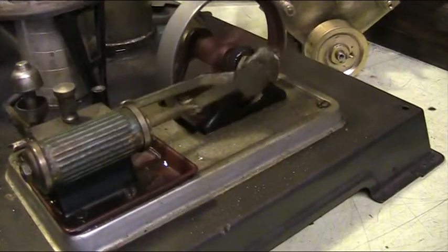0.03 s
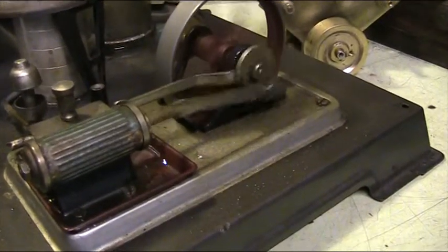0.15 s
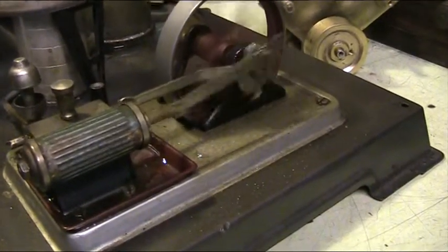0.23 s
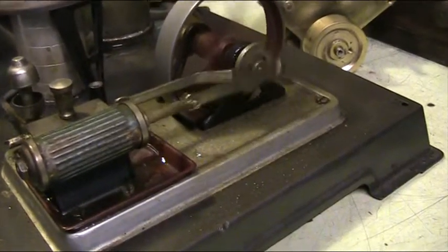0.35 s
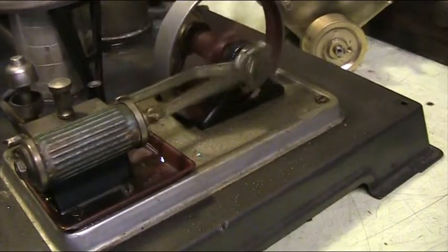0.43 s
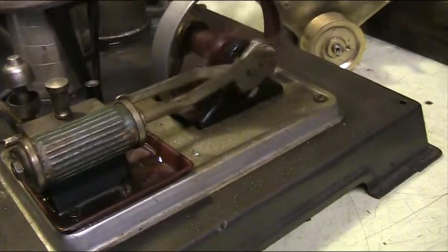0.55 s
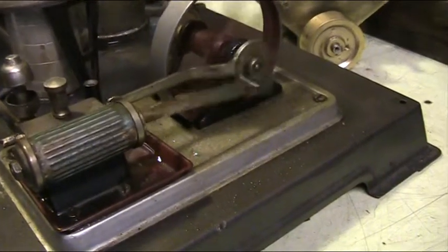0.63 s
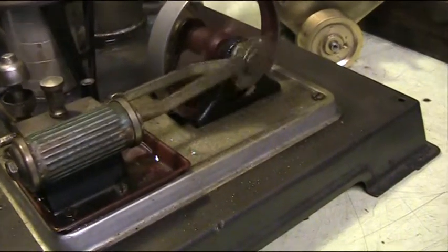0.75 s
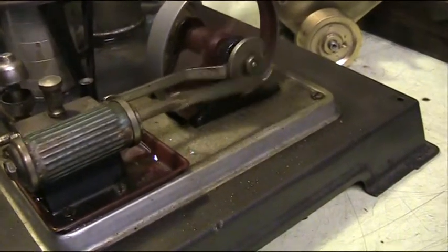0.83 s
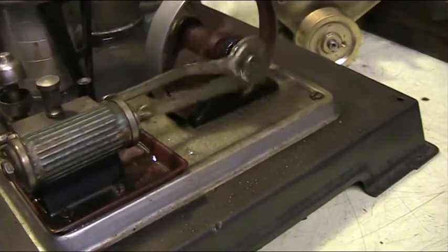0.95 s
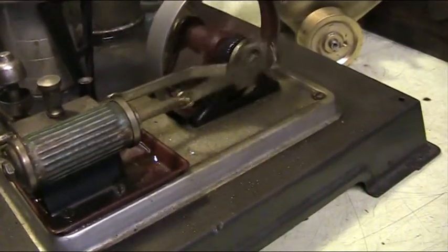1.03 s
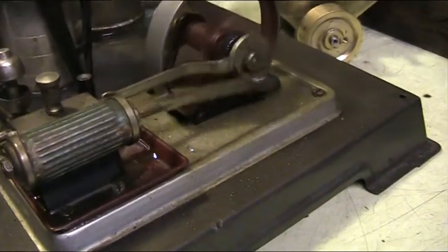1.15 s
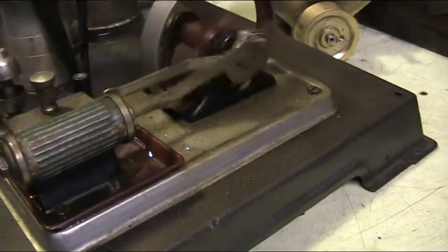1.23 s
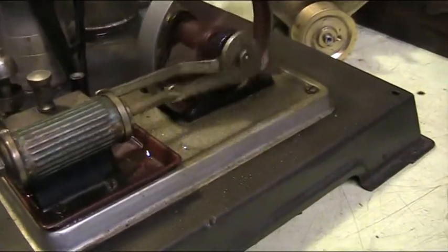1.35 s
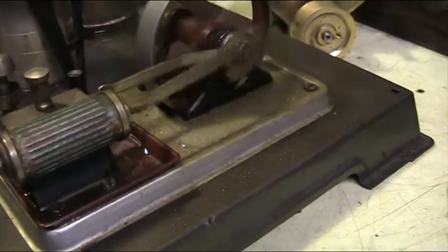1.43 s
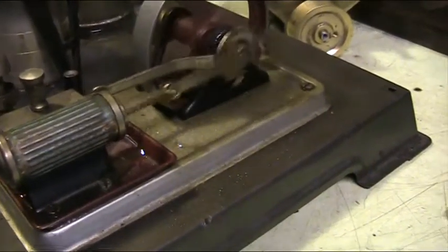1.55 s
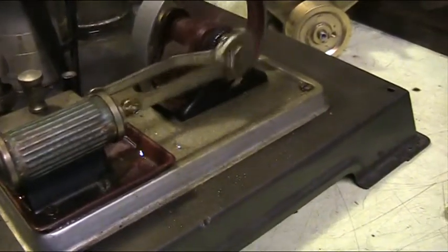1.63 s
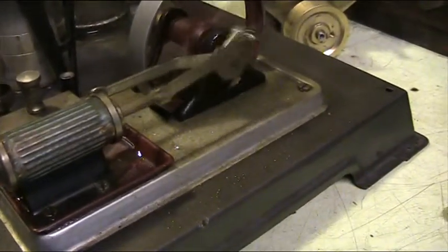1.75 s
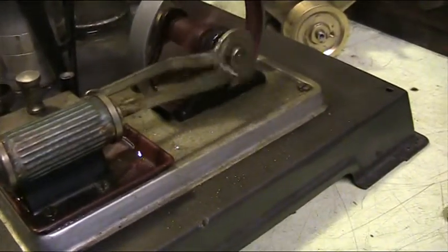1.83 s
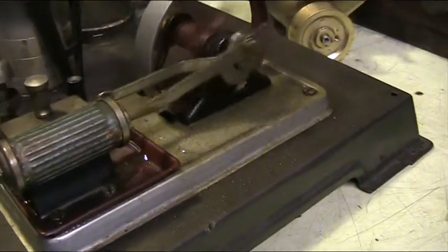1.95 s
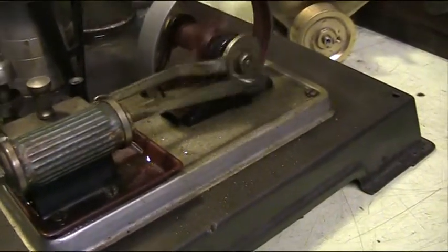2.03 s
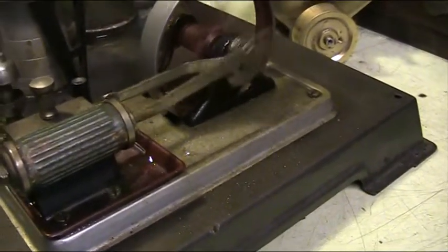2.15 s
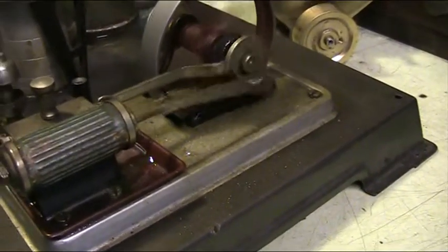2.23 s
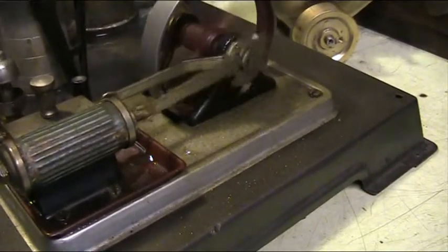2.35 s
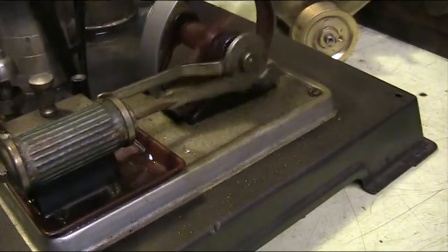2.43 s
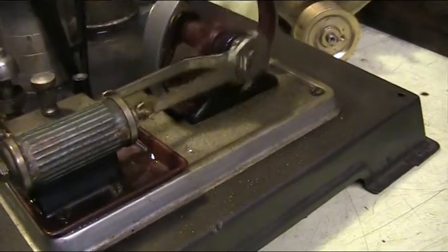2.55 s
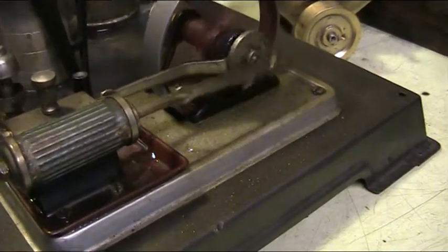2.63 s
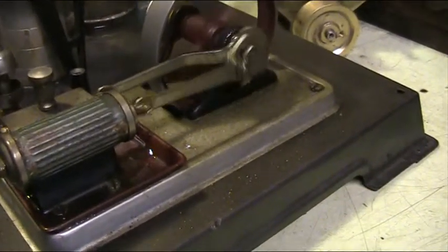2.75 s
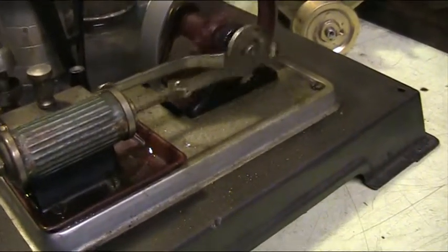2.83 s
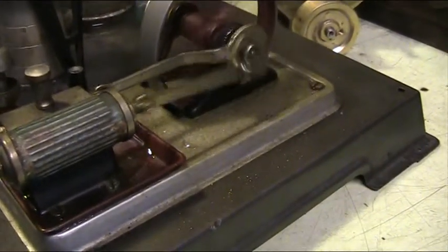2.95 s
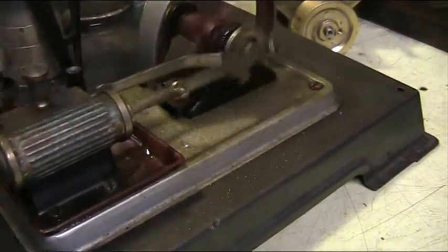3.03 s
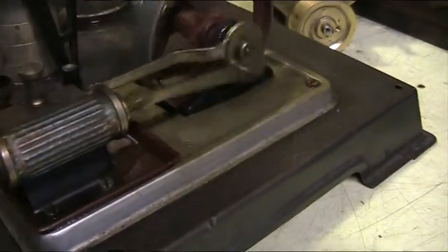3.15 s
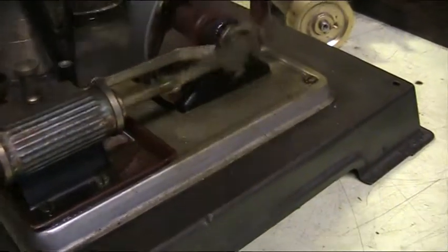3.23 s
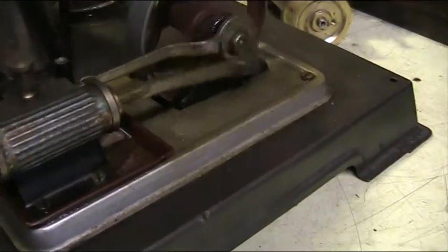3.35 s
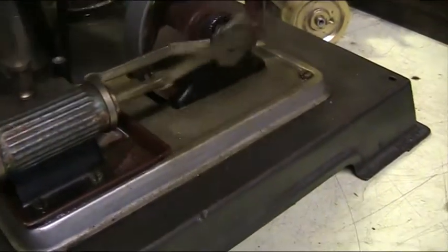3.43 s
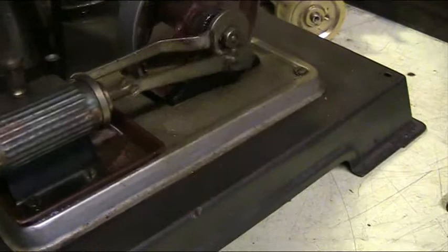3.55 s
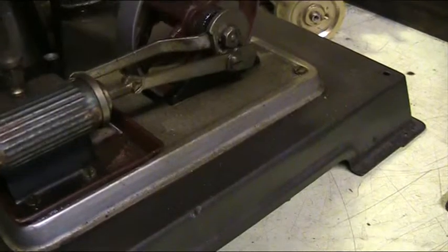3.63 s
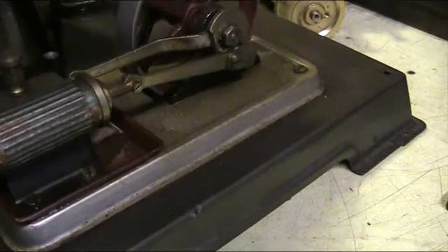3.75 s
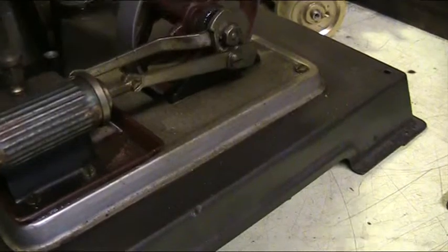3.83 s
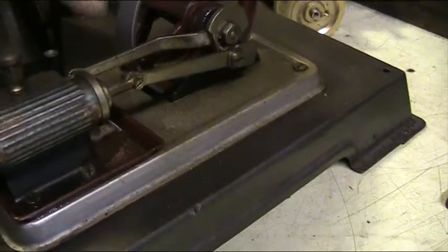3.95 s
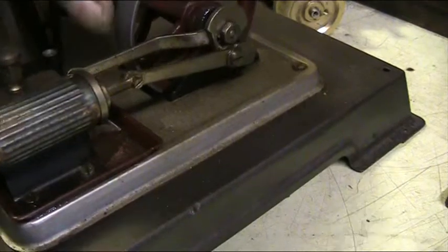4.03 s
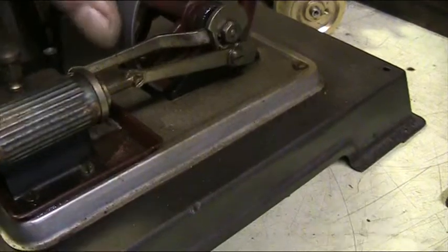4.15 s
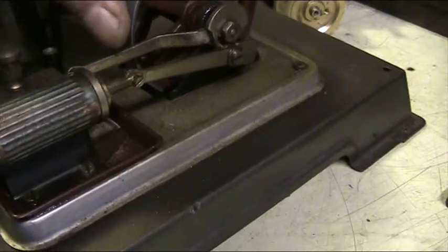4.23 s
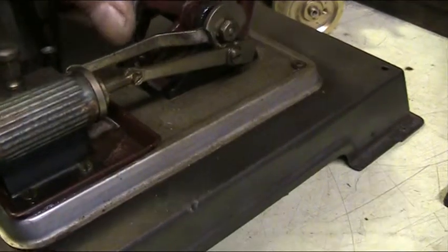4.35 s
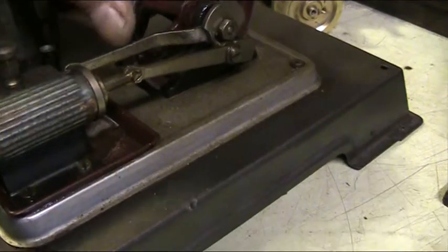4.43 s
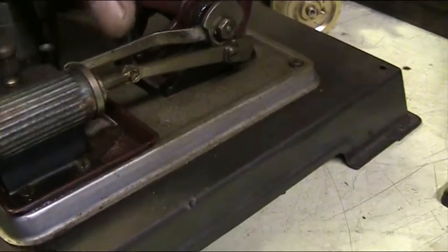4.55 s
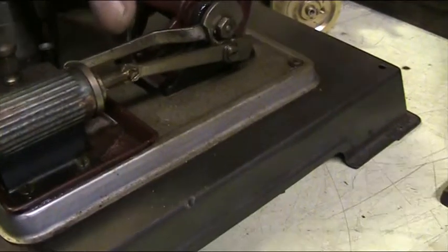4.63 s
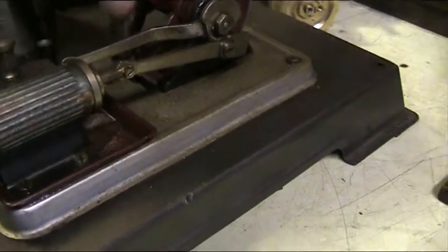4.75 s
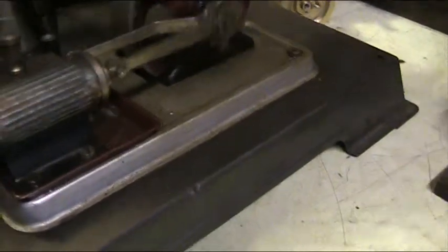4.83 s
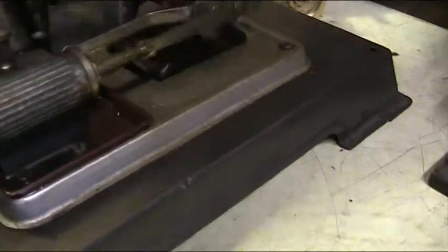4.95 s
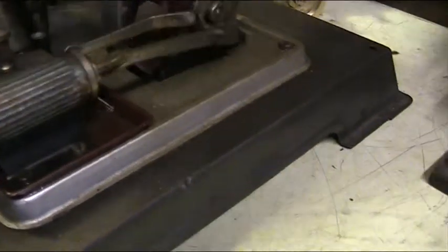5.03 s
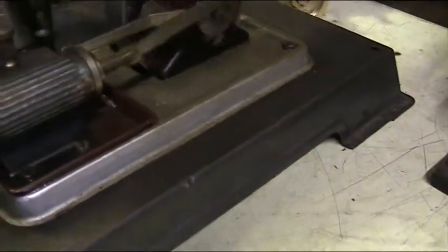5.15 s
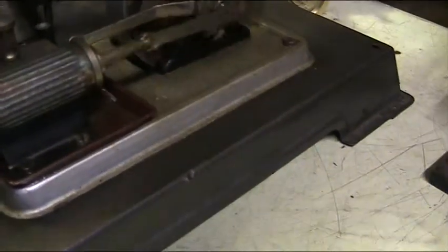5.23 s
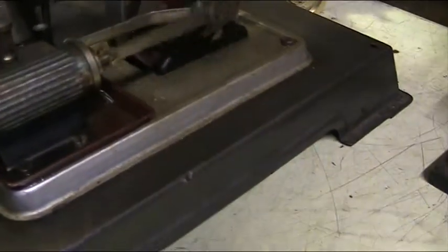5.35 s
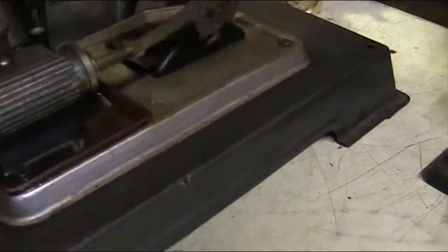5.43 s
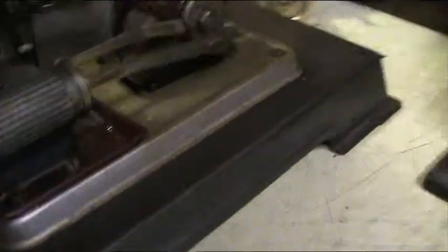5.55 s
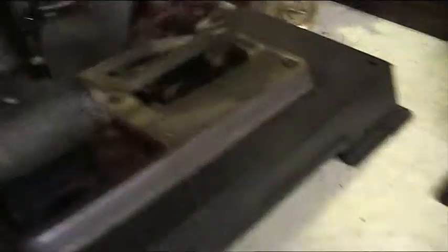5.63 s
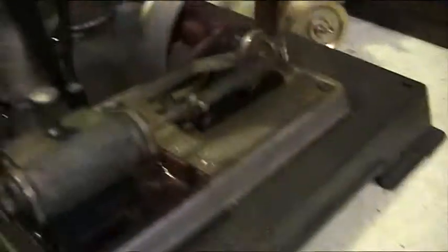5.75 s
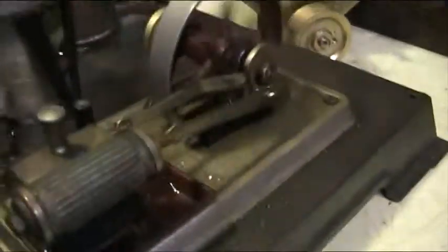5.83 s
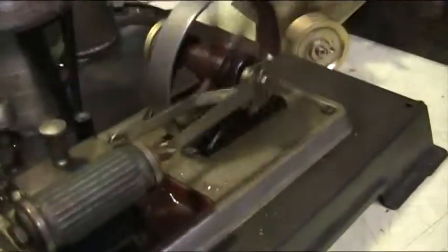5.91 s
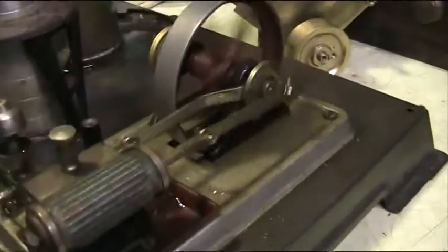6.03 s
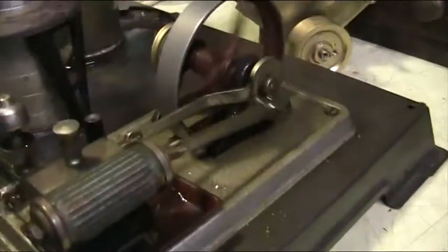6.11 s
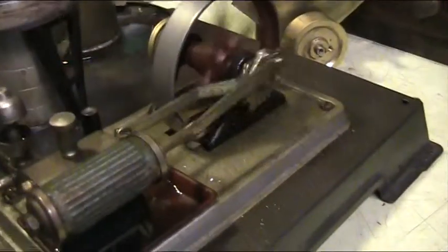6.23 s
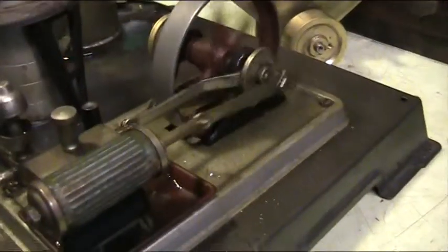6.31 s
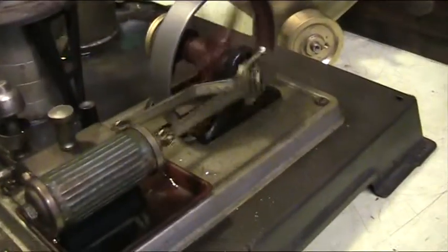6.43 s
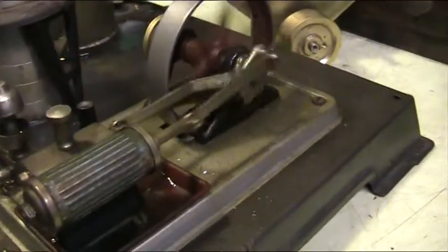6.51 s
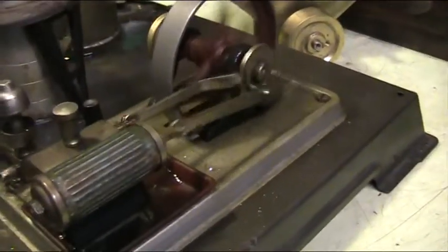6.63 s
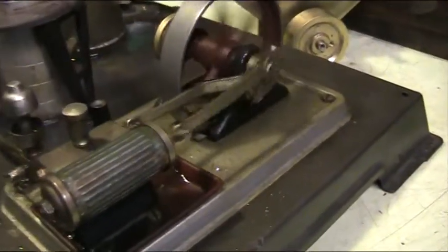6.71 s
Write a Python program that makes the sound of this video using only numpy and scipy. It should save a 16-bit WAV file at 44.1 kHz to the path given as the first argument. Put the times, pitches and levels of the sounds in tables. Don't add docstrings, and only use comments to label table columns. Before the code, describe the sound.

A small toy steam engine clatters fast and evenly over hissing, whistling steam, is stopped by hand, then restarts at a slower beat.

```python
import sys
import numpy as np
from scipy import signal
from scipy.fft import rfft, irfft, next_fast_len
from scipy.io import wavfile
from scipy.ndimage import uniform_filter1d, map_coordinates

SR = 44100
rng = np.random.default_rng(int(sys.argv[2]) if len(sys.argv) > 2 else 0)


def gain_from_db(level_db):
    decades = np.asarray(level_db, float) / 20
    return 10 ** decades


def generate_wav(sig):
    pcm = np.round(np.clip(np.atleast_2d(sig).T, -1, 1) * 32767).astype(np.int16)
    wavfile.write(sys.argv[1], SR, pcm)


N = 298998
T = np.arange(N) / SR
SLOW_FROM = 4
HARD_TICK_DB = -12
SWING_S = .0045

# t/s, click/dB, f/Hz, plate/dB, rattle/dB
TURNS = [(0.0848, -5.5, 5220, -15.5, -9.5), (0.2549, -8, 5800, -13, -10.5),
         (0.4245, -5.5, 5500, -14, -24.5), (0.5913, -3, 5470, -12, -15), (0.7573, -6, 5430, -12, -25),
         (0.925, -11, 3620, -17.5, -12.5), (1.0939, -5, 4550, -13.5, -13), (1.2657, -29, 5160, -18, -20),
         (1.4397, -7, 4240, -17.5, -9), (1.6154, -7, 4700, -15.5, -20), (1.795, -8, 3700, -11.5, -10),
         (1.979, -7, 4570, -14, -12), (2.166, -8.5, 5800, -13.5, -7.5), (2.352, -5.5, 4970, -13.5, -11),
         (2.5357, -7, 5000, -13, -10.5), (2.724, -6.5, 5550, -17, -10.5), (2.9153, -4, 5230, -18, -9),
         (3.1062, -8.5, 4360, -17.5, -10), (3.2957, -6, 5150, -13, -13), (3.487, -8, 5280, -12, -13.5)]
# t/s, click/dB, f/Hz, plate/dB, rattle/dB
SLOW_TURNS = [(4.774, -48, 3000, -47, -45), (5.051, -13.5, 2640, -16, -12.5),
              (5.315, -22, 3150, -17, -10.5), (5.5833, -15.5, 3200, -16.5, -14),
              (5.8486, -15, 3390, -14, -8.5), (6.119, -14.5, 3350, -16, -12),
              (6.3835, -14.5, 3430, -15.5, -13.5), (6.6526, -30, 5700, -15.5, -15)]
# t/s, share 0-1
RUNNING = [
    (0, 1),
    (3.56, 1),
    (3.62, 0),
    (4.76, 0),
    (4.8, 1),
    (6.78, 1),
]
# t/s, peak/dB, f/Hz
CLICKS = [(0.079, -12, 3800), (0.2427, -24, 5350), (0.407, -30.5, 4000), (0.588, -35, 3900),
          (0.7528, -12, 3780), (1.078, -15.5, 3080), (1.088, -12.5, 3760), (1.6098, -12.5, 4000),
          (1.7769, -13.5, 5200), (1.96, -11, 5100), (2.143, -13.5, 5360), (2.149, -24, 3400),
          (2.331, -19, 7060), (2.518, -13, 3300), (2.704, -19, 3330), (2.8928, -18, 5330),
          (2.9082, -23, 3800), (3.0895, -12, 5360), (3.2757, -12.5, 5050), (3.467, -16, 3400)]
# t/s, peak/dB, f/Hz
TICKS = [(0.3736, -19, 6140), (0.5326, -16, 6300), (1.937, -13, 5930), (1.781, -20, 4800),
         (2.2902, -8, 5970), (2.2898, -11, 3300), (3.226, -20, 7300), (4.935, -23, 3300),
         (4.943, -23, 3400), (4.949, -27, 3700), (2.889, -18, 4200), (2.8957, -18, 4600),
         (1.965, -18, 4500), (2.524, -14, 5000), (3.0825, -18, 4500), (6.672, -32, 3510),
         (3.432, -20, 3080), (5.242, -18, 4330), (5.462, -17, 3320), (5.469, -12, 3150), (5.509, -13, 6280),
         (5.617, -14, 1520), (5.7301, -16, 3200), (5.738, -14.5, 2930), (5.8575, -8.5, 5730),
         (5.926, -19, 2740), (6.0658, -18, 6200), (6.21, -23, 2460), (6.332, -18.5, 2900),
         (6.415, -18.5, 2620), (6.576, -17.5, 2600)]
# t/s, peak/dB, f/Hz
RESTART = [(4.9713, -5.5, 5650), (4.9718, -15, 3200), (4.9739, -6, 5820), (4.975, -13, 3200),
           (4.9775, -11.5, 6360), (4.9812, -13, 5800), (4.983, -8.5, 5800), (4.986, -13, 5900),
           (4.9847, -16, 3320), (4.988, -24, 3180), (4.993, -18, 5700), (4.999, -16, 3480),
           (5.005, -18, 3260)]
# plate pitch over its mean, low modes/dB, pin ring peak/dB
BLOWS = [(1.04, 2, -45), (1.1, 2.5, -41), (1.18, 3.5, -46), (1.12, -1.5, -43), (0.994, 1, -37), (1, 6, -47),
         (0.99, 1, -43.5), (1.004, 1, -56), (0.96, 5, -29.5), (1.01, -3, -48), (1.006, -1, -33),
         (1.038, 0, -41), (0.98, 3.5, -38), (1.1, 0, -31.5), (1.06, 5.5, -49), (1.038, -6, -30),
         (0.97, 4, -48), (1.13, 7, -50), (1.03, -2, -37), (1.1, 0, -33), (1.051, 15, -70), (0.97, -3, -70),
         (0.95, -3, -70), (0.95, -3, -70), (0.981, -2, -70), (0.97, -0.5, -70), (0.98, -7, -70),
         (0.92, 3, -70)]


def unit(x):
    return x / np.sqrt(np.mean(x ** 2) + 1e-20)


def along(points, hz):
    f, v = np.transpose(points)
    return np.interp(np.log(hz + 1), np.log(f + 1), v)


def curves(rows, at=T):
    s, *cols = np.transpose(rows)
    return np.array([np.interp(at, s, c) for c in cols])


def wobble(rate):
    return map_coordinates(rng.standard_normal(int(N * rate / SR) + 4), [T * rate])


def filtered(x, response):
    m = next_fast_len(x.shape[-1] + 4096)
    return irfft(rfft(x, m) * response(np.fft.rfftfreq(m, 1 / SR)), m)[..., :x.shape[-1]]


def band(lo_hz, hi_hz):
    return lambda f: 1 / (1 + (lo_hz / (f + 1)) ** 4) / (1 + (f / hi_hz) ** 4)


def bed(points):
    return lambda f: gain_from_db(along(points, f))


def cavities(floor, peaks):
    def response(f):
        power = sum(gain_from_db(2 * db) / (1 + (2 * (f - c) / w) ** 2) ** 1.04 for c, w, db in peaks)
        return np.sqrt(gain_from_db(2 * along(floor, f)) + power)
    return response


def rush(gain, alike, patchy_db=None, size=6):
    pair = rng.standard_normal((2, N))
    if patchy_db:
        z = signal.stft(pair, nperseg=512)[2]
        field = uniform_filter1d(rng.standard_normal(z.shape[1:]), size=5, axis=0)
        field = uniform_filter1d(field, size=size, axis=1)
        pair = signal.istft(z * gain_from_db(patchy_db * unit(field)), nperseg=512)[1][:, :N]
    turn = lambda hz: np.arccos(np.clip(along(alike, hz), -1, 1)) / 2
    mid, side = filtered(pair, lambda hz: gain(hz) * [np.cos(turn(hz)), np.sin(turn(hz))])
    return unit(np.array([mid + side, mid - side]))


def drifting(x, depth, rate):
    at = np.arange(N) + np.cumsum(depth * wobble(rate))
    return np.array([map_coordinates(side, [at], mode="mirror") for side in x])


def add(track, s, sound):
    part = track[..., round(s * SR):][..., :sound.shape[-1]]
    part += sound[..., :part.shape[-1]]


def ring(t, hz, t60, attack, crest=0):
    return np.sin(2 * np.pi * hz * (t - crest)) * gain_from_db(-60 * t / t60) * (1 - np.exp(-t / attack))


def walls(x):
    # f/Hz, t60/s
    decay = [(200, 0.17), (2000, 0.12), (10000, 0.085)]
    hz, t, z = signal.stft(rng.standard_normal((2, SR // 4)), SR, nperseg=256)
    tail = signal.istft(z * gain_from_db(-60 * t / along(decay, hz)[:, None]), SR, nperseg=256)[1]
    late = np.pad(x, ((0, 0), (150, 0)))
    return signal.fftconvolve(late, tail / np.linalg.norm(tail[0]), axes=1)[:, :N]


def drone():
    # t/s, f/Hz, level/dB
    motor_speed = [(0.0, 30.3, -54), (0.73, 39.6, -68), (0.89, 51.7, -52.5), (3.36, 52.4, -62),
                   (3.59, 61.4, -54), (3.74, 61, -65), (3.93, 40.7, -67), (4.14, 33.2, -65),
                   (4.49, 38.1, -68), (5.38, 35.37, -49.5), (5.93, 37.76, -50), (6.27, 49.4, -49.5),
                   (6.69, 47.8, -62), (6.78, 51.4, -53)]
    pitch_hz, level_db = curves(motor_speed)
    phase = 2 * np.pi * np.cumsum(pitch_hz) / SR + 0.33 * wobble(5)
    motor = gain_from_db(level_db + 0.78 * wobble(6.1)) * np.sin(phase)
    hum = gain_from_db(-66 + 2.8 * wobble(5.0)) * np.sin(2 * np.pi * 101 * T + 0.54 * wobble(4.27))
    return motor + hum


def shop():
    # t/s, level/dB
    handling = [(0.0, -52), (0.58, -62), (2.28, -63), (3.89, -60.5), (5.1, -62), (5.8, -53.5),
                (6.78, -62.5)]
    # f/Hz, density/dB per Hz
    rumble_bed = [(12, -20), (20, -8), (43, 6.5), (86, -8.5), (100, -28), (130, -59), (220, -120)]
    burner_bed = [(45, -35), (80, -11.5), (110, 4), (150, 4.5), (205, -2), (270, 1.5), (335, -3.5),
                  (400, 0), (600, -1.5), (1080, -6), (1600, -4.5), (2200, -5), (2600, -17), (2750, -120)]
    # t/s, level/dB
    flame = [(0, 0.5), (3.55, 0), (3.75, 0.5), (3.9, -3), (4, -4), (4.12, -2), (4.5, -2), (4.7, 0.5),
             (6.78, 1)]
    # t/s, level/dB
    rubbing = [(2.25, -70), (2.4, -46), (2.55, -69), (4.1, -68), (4.25, -54), (4.45, -50.5), (4.6, -57),
               (4.7, -76)]
    # f/Hz, left-right likeness
    burner_alike = [(60, 1), (200, 0.72), (550, 0.8), (1650, 0.95), (2700, 0.67)]
    rub_alike = [(60, 1), (180, 0.51), (550, 0.73), (1650, 0.62), (4970, 0.88), (15000, 0.26)]
    running = curves(RUNNING)
    rumble_db = curves(handling)[0] + 2.0 + 0.57 * wobble(4.0)
    rumble = gain_from_db(rumble_db) * rush(bed(rumble_bed), [(30, 0.68)])
    burner_db = -50.5 + 3.5 * running[0] + curves(flame)[0]
    burner = gain_from_db(burner_db + 1.5 + 1.2 * wobble(18)) * rush(bed(burner_bed), burner_alike, patchy_db=1.5)
    sheet = lambda f: 1 / (1 + ((f - 1560) / 190) ** 2)
    bearing = running * gain_from_db(-59.0 + 8.5 * np.clip(wobble(77), -2, 1.6)) * rush(sheet, [(1500, 1.0)])
    rub = gain_from_db(curves(rubbing) + 1.6 * wobble(23.0)) * rush(band(430, 540), rub_alike)
    hiss = gain_from_db(-63) * rush(band(6000, 20000), [(9000, .05)])
    return (rumble + drone()) * gain_from_db([[-.7], [.7]]) + burner * gain_from_db([[-.6], [.6]]) + bearing + rub + hiss


def crank():
    return np.array(TURNS + SLOW_TURNS)


def stroke(part, port, gains):
    change, opens, shuts, spit, centre, edge, lag = port
    late = (part - .1) % 1 + .1
    ajar = np.clip((late - opens) / edge + .5, 0, 1) * np.clip((shuts - late) / edge + .5, 0, 1)
    change_spit = np.exp(-((part - change) / spit) ** 2)
    centre_spit = np.exp(-(((part - lag + .5) % 1 - .5) / centre) ** 2)
    return np.array(gains) @ [1 - ajar, ajar, change_spit, centre_spit]


def valve():
    # port shut/dB, port open/dB, changeover spit/dB, dead-centre spit/dB
    fast_gains = [(1.5, -5.5, 4.5, 14.5), (-10.5, 1.5, 10.5, 12.5), (1.5, -4, 3, -2)]
    slow_gains = [(-0.5, -4.5, 2.9, 7.5), (-15.5, 1, 13.4, 5), (1, -11, 7.4, 1.4)]
    ports = [
        (0.568, 0.635, 0.937, 0.015, 0.031, 0.09, 0.0092),
        (0.61, 0.67, 1, 0.031, 0.037, 0.078, 0.036),
    ]
    s = crank()[:, 0]
    fast, slow = s[s < SLOW_FROM], s[s > SLOW_FROM]
    s = np.r_[2 * fast[0] - fast[1], fast, 2 * fast[-1] - fast[-2], slow, 2 * slow[-1] - slow[-2]]
    part = np.interp(T, s, np.arange(len(s))) % 1
    flick, catch = RESTART[0][0], SLOW_TURNS[1][0]
    part = np.where((T > SLOW_FROM) & (T < flick), .3, part)
    geared = 1 - np.interp(T, [flick - .01, flick, catch - .02, catch], [0, 1, 1, 0])
    at_speed, slowly = stroke(part, ports[0], fast_gains), stroke(part, ports[1], slow_gains)
    return geared * np.where(T < SLOW_FROM, at_speed, slowly) * curves(RUNNING)


def jets():
    # t/s, boiler pressure/dB, gland wetness/dB
    boiler = [(0.0, -44.5, -48), (0.75, -45, -48), (1.3, -47, -51), (2.19, -45.5, -49),
              (3.36, -45.5, -49.5), (3.52, -47.5, -48.5), (3.78, -43, -44.5), (4.21, -42.5, -44.5),
              (4.51, -42, -45.5), (4.79, -44, -47.5), (5.17, -40, -48.5), (5.35, -42, -43.5),
              (5.78, -40, -40.5), (5.97, -41.5, -43), (6.78, -42, -44)]
    (pressure_db, wet_db), (running,) = curves(boiler), curves(RUNNING)
    seep_db = pressure_db - 33 + 6.4 * (pressure_db - pressure_db.max())
    driven_db = pressure_db - 6 - np.clip(T - RESTART[0][0], 0, None)
    return valve() + [pressure_db, running * driven_db + (1 - running) * seep_db, wet_db]


def leak(level_db, sputter):
    # f/Hz, density/dB per Hz
    leak_bed = [(1800, -25.5), (2700, -6.5), (3600, -8), (4900, -25.5), (6400, -19), (7600, -14.5),
                (8300, -24), (10000, -41), (11000, -16)]
    # f/Hz, width/Hz, level/dB
    leak_peaks = [(1640, 520, -10), (3178, 113, 0.5), (3390, 100, -11), (4025, 204, -2), (8660, 125, -6.5),
                  (9450, 125, -7)]
    throat_peaks = [(5520, 300, -2), (5765, 89, 4), (6080, 89, -3)]
    # f/Hz, left-right likeness
    leak_alike = [(2000, 0.85), (3500, 0.93), (4200, 0.87), (4900, 0.9), (5600, 0.86), (9000, 0.65)]
    # t/s, level/dB
    throat = [(0, 1), (1.5, -0.5), (3.4, 0.5), (3.7, -2.5), (4.0, -3), (4.3, 0.5), (4.65, 2.5), (4.85, 1),
              (5.3, -4.5), (6, -2), (6.78, -2)]
    # t/s, level/dB, half length/s
    spurts = [(0.184, 3, .005), (0.522, 11, .005), (0.68, 6, 0.0054), (0.847, 9, 0.0046), (1.222, 5, .004),
              (1.381, 14, .004), (1.852, 4, .004), (2.103, 20, .005), (2.275, 9, .004), (2.649, 10, 0.0037),
              (3.218, 11, 0.005), (4.864, 7, 0.004), (4.94, 8, 0.0065), (4.9525, 16, 0.0022),
              (5.216, 9, 0.0062), (5.343, 10, 0.0096)]
    throat_db = curves(throat)[0] + sum(db * np.exp(-((T - s) / half) ** 2) for s, db, half in spurts)
    hiss = rush(cavities(leak_bed, leak_peaks), leak_alike, patchy_db=.9)
    whistle = drifting(rush(cavities([(5000, -47)], throat_peaks), leak_alike, patchy_db=1.0), .012, 4)
    sound = hiss + gain_from_db(throat_db + wobble(60)) * whistle
    return gain_from_db(level_db + 1.5 + 2.0 * sputter + 0.85 * wobble(300)) * sound


def exhaust(level_db, sputter):
    # f/Hz, density/dB per Hz
    puff_bed = [(700, -18.5), (1500, -15.5), (2300, -12), (3200, -4), (3700, -4), (4100, -5), (4900, -10),
                (6000, 3.5), (6800, -4.5), (7800, -6), (9300, -3), (9750, -4.5), (10400, -18.5),
                (12000, -25), (14000, -22)]
    # f/Hz, gain/dB
    fast_jet = [(5400, 1), (6250, 3), (7100, 1.5), (8000, 1), (9800, -3.5), (10400, 14), (11100, 21),
                (11900, 23), (12500, -2), (13500, -16)]
    warm_jet = [(9500, -0.5), (10300, 6), (11000, 19), (11800, 15), (12600, 0)]
    # t/s, share 0-1
    warming = [
        (5.6, 0),
        (5.8, 0.4),
        (6.05, 0.9),
        (6.78, 1),
    ]
    spray = gain_from_db(1.1 * wobble(400))
    puff = rush(bed(puff_bed), [(3000, 1.0), (6000, 0.69), (9000, 0.7)], patchy_db=2.2)
    fast = filtered(puff, bed(fast_jet))
    slow = puff + curves(warming) * filtered(puff, lambda f: bed(warm_jet)(f) - 1)
    return gain_from_db(level_db + 13.0 + 0.22 * sputter) * spray * np.where(T < SLOW_FROM, fast, slow)


def gland_fizz(level_db):
    # f/Hz, density/dB per Hz
    fizz_bed = [(6000, -22.5), (7900, -14.5), (8800, -7), (10000, -11), (10600, -12.5), (12400, -4),
                (13000, -23), (14200, -19), (16000, -29)]
    # f/Hz, width/Hz, level/dB
    gland_peaks = [(10600, 230, -1.5), (11160, 90, 3.5), (11850, 160, -7), (12700, 140, -8),
                   (13400, 100, -14)]
    alike = [(9000, 0.54), (11000, 0.52), (12000, 0.46), (14500, 0.5)]
    spray = rush(cavities(fizz_bed, gland_peaks), alike, patchy_db=1.8, size=50)
    return gain_from_db(level_db + 3.5 + .7 * wobble(30)) * drifting(spray, .006, 3)


def steam():
    # f/Hz, lead/radians
    left_leads = [(4000, 0.02), (6200, 0.3), (10600, 0.52), (11700, 2.23), (16000, 1.85)]
    leak_db, exhaust_db, fizz_db = jets()
    sputter = wobble(45) * (.45 + .55 * curves(RUNNING)[0])
    sound = leak(leak_db, sputter) + exhaust(exhaust_db, sputter) + gland_fizz(fizz_db)
    return filtered(sound, lambda f: np.exp(.5j * along(left_leads, f) * [[1], [-1]]))


def bench():
    # t/s, peak/dB, f/Hz, ring over puff
    taps = [(4.12, -40, 594, 0.33), (4.752, -36, 1106, 0.92), (4.764, -35, 421, 1.4),
            (4.775, -36.5, 1100, 1), (4.788, -40, 995, 0.76), (4.852, -52, 1380, 1)]
    out, t = np.zeros(N), np.arange(SR // 10) / SR
    swell = np.sin(np.pi * np.clip(t / 0.052, 0, 1) ** 1.18)
    for s, _, _, plate_db, _ in crank():
        db = (-35.5 if s < SLOW_FROM else -40) + 0.16 * (plate_db + 14.5)
        hz = 179 * (1 + rng.normal(0, 0.0033))
        add(out, s, gain_from_db(db - 2.0) * swell * np.sin(2 * np.pi * hz * t))
    for s, db, hz, share in taps:
        puff = unit(filtered(rng.standard_normal(len(t)), band(390, 2100)))
        puff = puff * gain_from_db(-60 * t / 0.09) * (1 - np.exp(-t / 0.0093))
        add(out, s, gain_from_db(db + 3.0) * (share * ring(t, hz, 0.1, 0.0086) + 1.17 * puff))
    return out


def knocks():
    lands_ms = [7.5, 6.3, 6.9, 7, 4, 6, 4.1, 7, 4, 7, 7, 4.05, 5.56, 4, 6, 3.44, 5.5, 3.51, 7, 6, 8.8, 11.5,
                11, 7.5, 11, 9, 10, 7.1]
    # t/s, peak/dB
    jolts = [(0.2484, -29), (1.4324, -21), (1.6095, -23), (1.972, -19), (2.153, -23), (2.731, -19.5),
             (1.4482, -23.5), (4.9713, -25), (4.982, -29), (4.999, -29)]
    centres = [(s + ms / 1000 - SWING_S + .0015, db, ratio, low_db)
               for (s, _, _, db, _), (ratio, low_db, _), ms in zip(crank(), BLOWS, lands_ms)]
    leads = [(s + 0.002024, -26.5) for s, db, _ in CLICKS if db > -30]
    ticks = [(s, db - 31) for s, db, _ in TICKS + RESTART if db > HARD_TICK_DB]
    return centres + [(*row, 1, 0) for row in leads + ticks + jolts]


def plate():
    # f/Hz, level/dB, t60/s
    plate_modes = [(1339, -7, 0.086), (1512, 1, 0.07), (1601, 0.5, 0.082), (1783, -1, 0.025),
                   (2020, -9, 0.072), (839, -7.5, 0.045), (428.4, -19, 0.16), (240, -13.5, 0.053)]
    out, t = np.zeros(N), np.arange(SR // 10) / SR
    at = crank()[:, 0]
    returns = [(a + 0.32 * (b - a), -35, 1, 0) for a, b in zip(at, at[1:]) if b - a < 1]
    for s, db, ratio, low_db in knocks() + returns:
        chance = np.clip(rng.standard_normal((len(plate_modes), 3)), -1.2, 1.2)
        modes = 0
        for (hz, level_db, t60), (a, b, c) in zip(plate_modes, chance):
            lean_db = low_db if hz < 1000 else np.clip(600 * (ratio - 1.01) * np.log2(hz / 1560), -4, 4)
            crest = SWING_S + .00011 * c
            modes = modes + gain_from_db(level_db + lean_db + 2.6 * a) * ring(t, hz * (1 + 0.011 * b), t60, 0.00083, crest)
        loose = unit(filtered(rng.standard_normal(len(t)), band(1900, 2400)))
        loose = loose * gain_from_db(-60 * t / 0.038) * (1 - np.exp(-t / 0.005))
        rocking = np.cos(2 * np.pi * (t + 0.0014) / 0.0121)
        throb = .65 - (0.46 if s < SLOW_FROM else 0.22) * rocking
        add(out, s - .0015, gain_from_db(db + 0.5) * throb * (modes / np.abs(modes).max() + .3 * loose))
    return out


def rattle():
    out, t = np.zeros((2, N)), np.arange(SR // 12) / SR - .03
    noise = rng.standard_normal((len(crank()), 3, len(t)))
    colour = lambda f: band(750, 7000)(f) * (1 + 1.8 / (1 + ((f - 1400) / 350) ** 2))
    judders = unit(filtered(noise[:, :2], colour)) * gain_from_db(18.0 * uniform_filter1d(noise[:, 2:], size=50))
    for (s, *_, rattle_db), judder in zip(crank(), judders):
        lead_db = -4.5 if s < SLOW_FROM else -14
        shape = np.where(t < 0, gain_from_db(lead_db - 20 * (t / 0.022) ** 4), gain_from_db(-60 * t / 0.082))
        add(out, s - .03, gain_from_db(rattle_db - 16.0) * shape * (judder[0] + 0.2 * judder[1] * [[1], [-1]]))
    return out


def pin():
    # t/s, peak/dB, f/Hz
    snaps = [(0.0777, -16, 8400), (0.249, -27.5, 10000), (0.4179, -20, 9500), (0.5853, -28, 9900),
             (0.7514, -25, 9900), (0.9176, -22, 8600), (1.0873, -26, 8400), (1.2604, -32, 11500),
             (1.4336, -22, 8900), (1.611, -35, 8700), (1.7888, -12, 8300), (1.973, -22, 8500),
             (2.1599, -24, 8500), (2.3458, -18, 8800), (2.529, -27, 9700), (2.718, -25, 9700),
             (2.9087, -34, 9800), (3.0997, -19, 9900), (3.29, -26, 7740), (3.481, -16, 9200)]
    # f/Hz, level/dB, t60/s
    pin_modes = [(7617, 0, .09), (11080, -9, .04), (14020, -9, .07), (15260, -14, .04)]
    out, t = np.zeros((2, N)), np.arange(SR // 12) / SR
    sizzles = unit(filtered(rng.standard_normal((len(snaps), 2, len(t))), band(2500, 13000)))
    sizzles = sizzles * gain_from_db(-60 * t / 0.016) * (t > .0008)
    for (s, db, hz), sizzle in zip(snaps, sizzles):
        ping = np.sin(2 * np.pi * hz * t) * np.exp(-((t - .0011) / .0002) ** 2 / 2)
        add(out, s, gain_from_db(db - 1.0) * (ping + 0.44 * (sizzle[0] + .4 * sizzle[1] * [[1], [-1]])))
    for (s, *_), (_, _, db) in zip(TURNS, BLOWS):
        chance = rng.standard_normal((len(pin_modes), 2))
        for (hz, level_db, t60), (a, b) in zip(pin_modes, chance):
            tone = gain_from_db(db + level_db + 1.3 * a) * ring(t, hz, t60, .0003)
            add(out, s + 0.003, tone * gain_from_db([[3 * b], [-3 * b]]))
    return out


def contacts():
    centres = [(s, db, hz, min(-30 - db, 0)) for s, db, hz in crank()[:, :3]]
    leads = [(s, db, hz, min(-39.5 - db, 0)) for s, db, hz in CLICKS]
    at = np.array(TURNS)[:, 0]
    returns = [(a + .54 * (b - a), -33, 5800) for a, b in zip(at, at[1:])]
    bounces = [(s + 0.011, db - 11, hz * 0.566) for s, db, hz in CLICKS]
    rebounds = [(s + k * 0.0034, db - 15.5 - 3 * k, hz) for s, db, hz in crank()[:, :3] for k in (1, 2)]
    light = [(*row, -28) for row in TICKS + RESTART + returns + bounces + rebounds]
    s, db, hz, dull_db = np.transpose(centres + leads + light)
    bright_db = -8.5 - 0.5 * (6 - hz / 1000) - 2 * np.clip(rng.standard_normal(len(s)), -1, 1)
    tick = np.isin(s, np.array(TICKS)[:, 0])
    bright_db = bright_db - 7 * (tick | (s > SLOW_FROM))
    return np.transpose([s, db, hz, bright_db, dull_db, np.where(tick, 0.027, 0.043)])


def linkage():
    out, t = np.zeros((2, N)), np.arange(SR // 20) / SR
    rise = 1 - np.exp(-t / 0.00027)
    hits = contacts()
    noise = rng.standard_normal((len(hits), 6, len(t)))
    grit = gain_from_db(27.2 * uniform_filter1d(noise[:, :1], size=40))
    pitch_hz, chatter_t60 = hits[:, 2, None, None], hits[:, 5, None, None]
    colour = lambda f: band(1300, 7200)(f) * (0.74 + 1 / (1 + ((f - pitch_hz) / 1100) ** 2))
    chatters = unit(filtered(noise[:, 1:3], colour)) * grit * gain_from_db(-60 * t / chatter_t60) * rise
    brights = unit(filtered(noise[:, 3:5], band(3360, 7600))) * grit * gain_from_db(-60 * t / 0.012) * rise
    dulls = unit(filtered(noise[:, 5], band(410, 1800))) * gain_from_db(-60 * t / 0.14) * rise
    for (s, db, hz, bright_db, dull_db, _), chatter, bright, dull in zip(hits, chatters, brights, dulls):
        width_s = .00021 if db > HARD_TICK_DB else .00014
        ping = 1.8 * np.sin(2 * np.pi * hz * t) * np.exp(-((t - .0011) / width_s) ** 2 / 2)
        clean = np.clip((db + 28) / 24, .15, 1)
        chatter, bright = (.34 - 0.11 * clean) * chatter, gain_from_db(bright_db + 2.0) * bright
        mid = clean * ping + chatter[0] + bright[0] + gain_from_db(dull_db - 2.0) * dull
        side = rng.normal(0, 0.12) * clean * ping + 0.26 * chatter[1] + 0.53 * bright[1]
        add(out, s, gain_from_db(db - 4.0) * (mid + np.array([side, -side])))
    return out


def scene():
    blows = linkage() + pin() + rattle() + plate() * gain_from_db([[-.2], [.2]]) + bench() * gain_from_db([[-.8], [.8]])
    return blows + gain_from_db(-20.0) * walls(blows) + gain_from_db([[-.3], [.3]]) * steam() + shop()


def roll_off(x):
    return signal.sosfilt(signal.butter(12, 16100, fs=SR, output="sos"), x)


def record(dry):
    mix = filtered(dry, lambda hz: hz < 15780)
    return roll_off(mix)


dry = scene()
out = record(dry)
generate_wav(out)
```